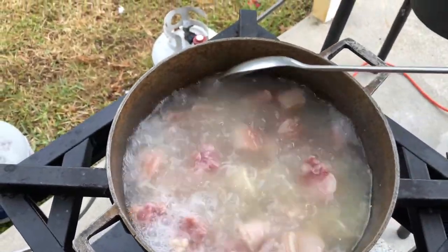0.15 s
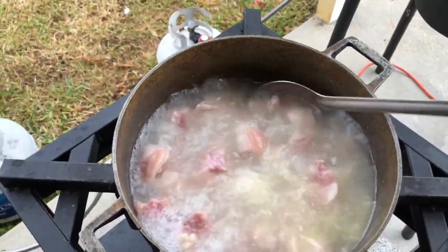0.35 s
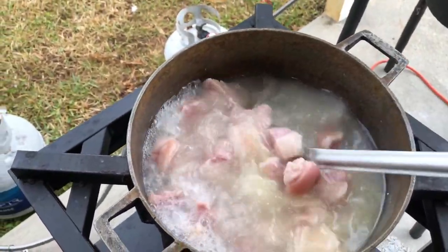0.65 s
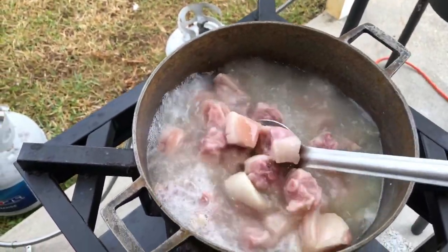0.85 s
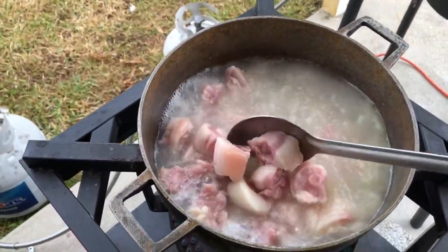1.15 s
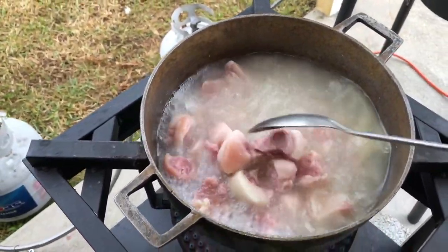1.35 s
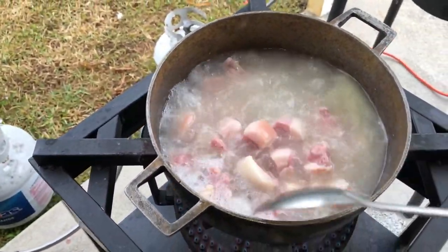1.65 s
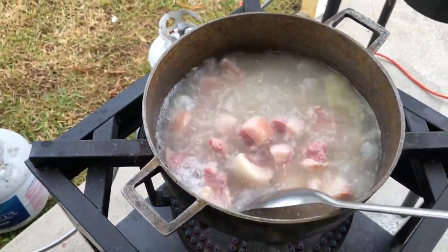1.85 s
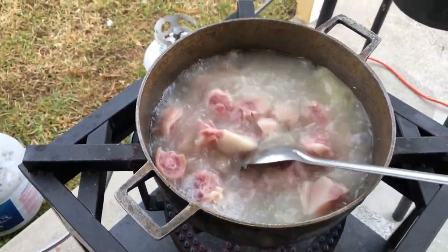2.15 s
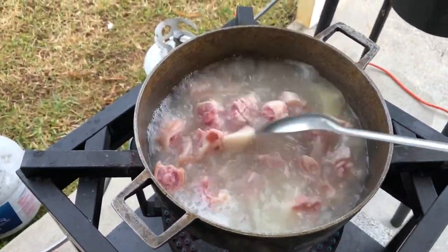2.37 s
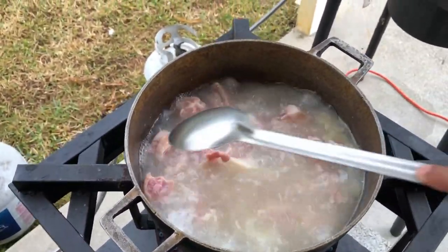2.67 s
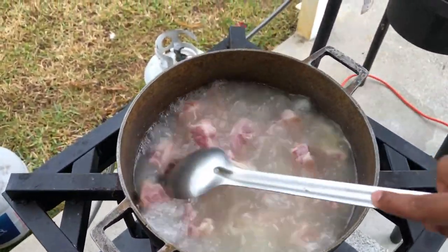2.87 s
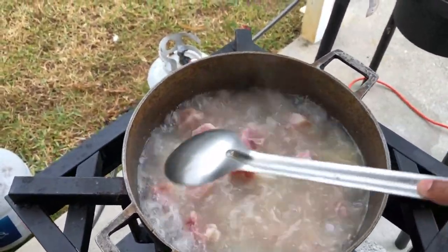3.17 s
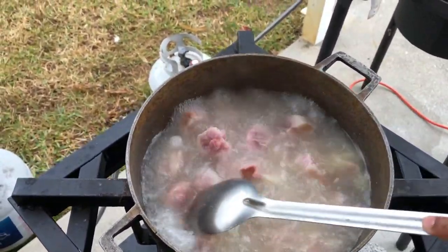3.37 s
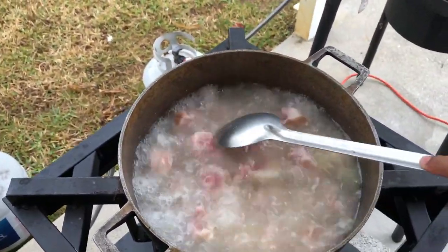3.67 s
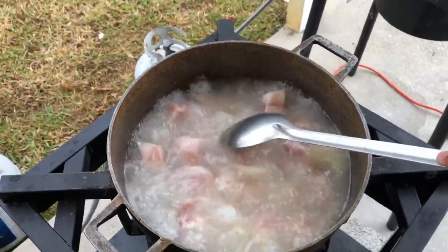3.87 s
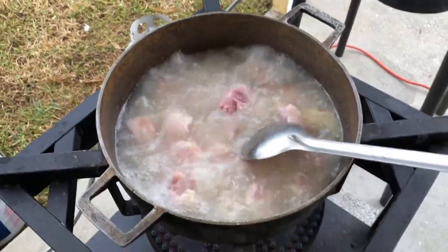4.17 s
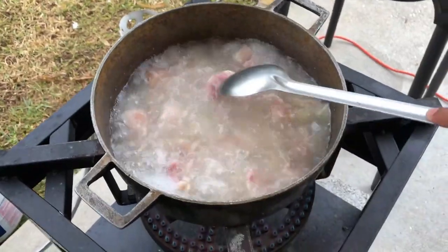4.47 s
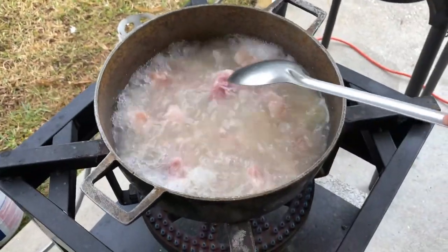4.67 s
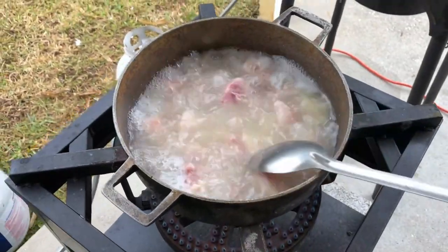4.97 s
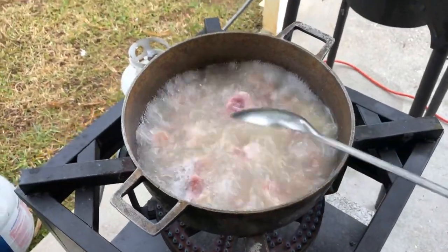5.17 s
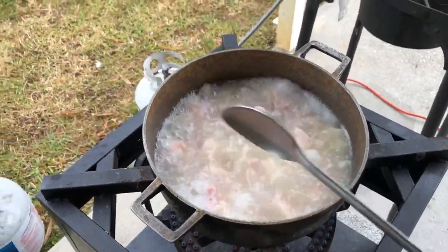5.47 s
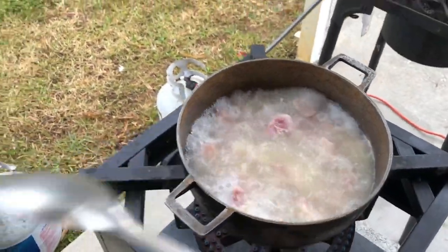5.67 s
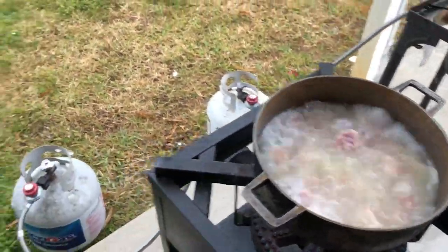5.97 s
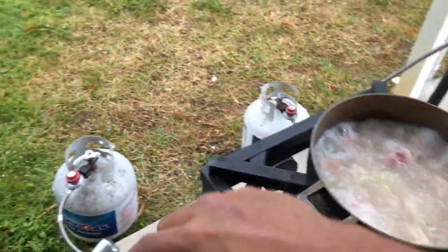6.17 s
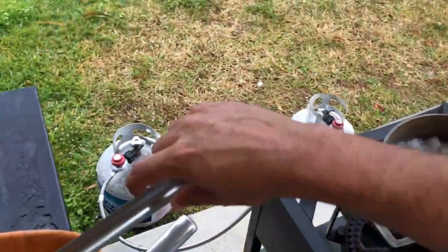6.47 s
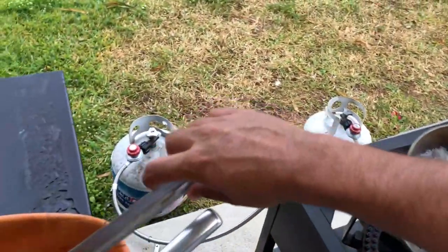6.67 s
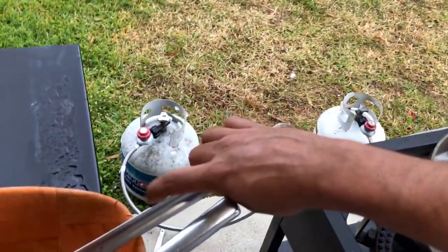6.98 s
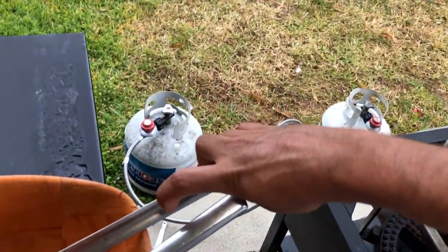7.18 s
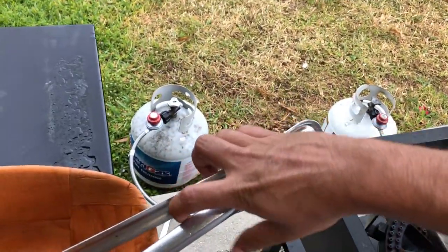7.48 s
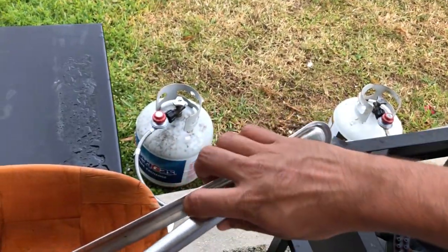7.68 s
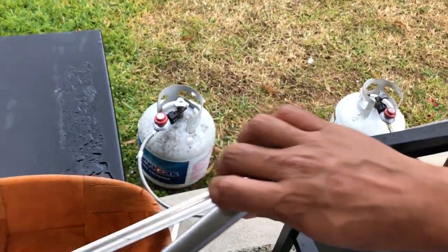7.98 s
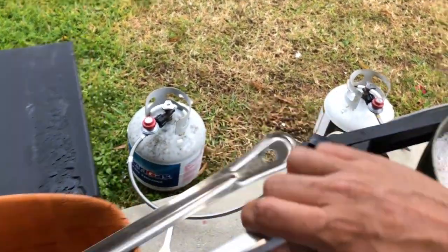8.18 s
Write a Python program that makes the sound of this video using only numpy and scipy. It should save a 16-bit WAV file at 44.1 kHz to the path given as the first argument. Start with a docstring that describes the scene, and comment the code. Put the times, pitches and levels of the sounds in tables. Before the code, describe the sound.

Throughout, a gas flame gives a broad, low-to-mid roar while a big iron pot boils hard, with dense wet plops and a thin high fizz. A bright spoon clink comes at 0.3 s with a small trailing touch at 0.4, then a faint scrape and sharp ticks near 0.7. Ringing clinks follow at 1.75 and 2.15 s, and a soft dull knock at 2.45. Low wind buffets at 2.6 and 3.0 s, growing to rumbling gusts from 3.5 to 5.4. Spoon taps sound at 4.55, 5.0 and 5.4 s, the last with a heavier thud. The wind fades by 6.2. At 6.37 s a utensil is put down with the loudest, short hard clack and a brief outdoor reflection. Faint rattling and sliding follow around 6.8 to 7.0, then tiny clicks from 7.7, a light knock at 8.0 and a last soft scrape near 8.3.

```python
"""Iron pot on a patio gas burner

One microphone on the patio takes in a big iron pot boiling over a roaring flame; a breeze buffets it.
Flame and breeze are shaped noise; steam bubbles plop and fizz as swarms of short damped sines.
A steel spoon knocks and slides on the pot; late on, a metal utensil is put down. Each blow is a burst of
noise through dense modes, with ringing metal and a short answer from the patio."""
import sys
import numpy as np
from scipy.fft import rfft, irfft, next_fast_len
from scipy.io import wavfile
from scipy.ndimage import uniform_filter1d, map_coordinates

SR = 44100
rng = np.random.default_rng(int(sys.argv[2]) if len(sys.argv) > 2 else 0)


def int16_out(signal):
    """Quantize to a 16-bit WAV file."""
    q = np.round(np.clip(np.atleast_2d(signal).T, -1, 1) * 32767)
    wavfile.write(sys.argv[1], SR, q.astype(np.int16))


N = 367353

# Steady breeze at the microphone. Each row: time in seconds, strength in dB.
WIND_LEVEL = [(0.0, -56), (0.28, -49.5), (1.14, -58.5), (2.55, -51), (3.48, -51), (3.62, -44.5),
              (4.01, -47), (4.24, -43.5), (5.15, -38.5), (6.19, -57), (8.33, -59.5)]
# Gusts riding on it. Each row: peak time in seconds, half length in seconds, peak strength in dB.
GUST_SWELLS = [(0.33, .11, -44), (2.58, 0.1, -42), (2.962, 0.092, -40.5), (3.58, 0.092, -39.5),
               (3.787, .04, -44), (4.055, 0.071, -39), (4.343, 0.081, -35.5), (4.52, 0.053, -31.5),
               (4.818, 0.077, -35.5), (5.14, 0.15, -37), (5.35, 0.045, -37), (5.752, 0.087, -40)]
# Spectrum of the slow lumps of air. Each row: frequency in Hz, relative density in dB per Hz.
LUMP_SPECTRUM = [(2, -27), (6, 10), (11, 4), (20, 3), (28, 1), (40, -24), (60, -22), (100, -50), (200, -57),
                 (480, -120)]
# Spectrum of the fast eddies. Each row: frequency in Hz, relative density in dB per Hz.
EDDY_SPECTRUM = [(10, 4), (27, -3.5), (50, -5.5), (65, -20), (100, -19), (130, -36.5), (200, -48),
                 (480, -120)]
# Flame level that also drives the plops. Each row: time in seconds, level in dB.
FLAME_LEVEL = [(0.0, -55.5), (0.51, -53), (0.72, -54.5), (1.69, -53), (1.97, -55), (2.37, -54),
               (2.55, -54.5), (3.04, -54.5), (4.66, -55.5), (5.61, -54), (5.84, -55), (8.33, -52.5)]
# Spectrum of the broad roar. Each row: frequency in Hz, relative density in dB per Hz.
FLAME_SPECTRUM = [(35, -42), (60, 1), (75, -4), (134, -5.5), (184, -16), (288, -11.5), (543, -14.5),
                  (866, -11), (987, -9), (1080, -8), (1600, -26), (2330, -27), (2810, -19.5), (3790, -44.5),
                  (5200, -59), (6760, -56), (11400, -120)]
# Resonances that the port in the microphone's case gives the roar, mainly near 1 and 3 kHz.
# Each row: frequency in Hz, width in Hz, gain in dB.
MIC_MODES = [(311.5, 29, -3.5), (890, 150, -4), (1159, 154, 1), (3060, 280, -13)]
# Level that drives the foam's fizz. Each row: time in seconds, level in dB.
FOAM_LEVEL = [(0.0, -72.5), (0.81, -70.5), (1.34, -73), (1.69, -70.5), (2.62, -70.5), (3.02, -73.5),
              (3.57, -70.5), (4.38, -72), (5.43, -70.5), (6.17, -75), (6.61, -72.5), (7.47, -75.5),
              (7.93, -72), (8.33, -75)]
# Spectrum of the fizz. Each row: frequency in Hz, relative density in dB per Hz.
FIZZ_SPECTRUM = [(2240, -31), (3800, -1), (4600, 0.5), (5000, -6.5), (5600, 2), (6620, -4.5), (7450, 0.5),
                 (9630, -3), (11200, 0), (12000, -5), (13700, -2), (15200, -8.5), (15800, -2.5)]
# Louder bubble snaps and light touches. Each row: start in seconds, nominal level in dB.
LOUD_SNAPS = [(0.6759, -45.5), (0.758, -50.5), (3.0836, -52), (3.3648, -50), (6.569, -53), (7.6844, -53),
              (7.818, -50.5), (8.064, -52), (8.158, -49.5)]
# Lower part of the snaps, strongest near 3 kHz. Each row: frequency in Hz, relative density in dB per Hz.
SNAP_BODY_COLOUR = [(1200, -28), (2300, 11), (3000, 17), (4200, -8), (5000, -13), (5700, -12), (8000, -10),
                    (15000, -33)]
# Steel slides along the pot or other utensils.
# Each row: middle in seconds, half length in seconds, level in dB, pitch in Hz.
SLIDES = [(0.63, 0.1, -61.5, 3860), (0.785, 0.034, -65.5, 3780), (1.678, 0.023, -60, 3800),
          (6.86, 0.11, -62.5, 2740), (7.893, 0.2, -71, 3850), (8.292, 0.087, -63, 2870)]
# Colours of a contact, from low to high; the tick also colours the upper part of the snaps.
# Each row: frequency in Hz, relative density in dB per Hz.
THUD_COLOUR = [(40, -69), (160, -13), (300, -8.5), (420, -9.5), (640, -6.5), (950, 2.5), (1200, -3),
               (1550, -23), (2200, -22), (5000, -102)]
CLINK_COLOUR = [(400, -69), (1100, 3), (1600, -12), (2200, -7), (2550, -5), (3000, 7.5), (3400, -8),
                (4300, -8), (5200, -20.5), (9000, -44)]
TICK_COLOUR = [(2000, -91), (4000, -30), (5000, -4.5), (5700, 9), (6600, -1.5), (8500, 3), (10500, -4.5),
               (11900, -0.5), (13200, -2), (14500, -17), (16000, -9)]
# Decay of the patio's answer. Each row: frequency in Hz, t60 in seconds.
PATIO_DECAY = [(200, 0.46), (1000, 0.38), (3000, 0.25), (8000, 0.2), (15000, .16)]
# Heavier knocks of pot and utensils. Each row: start in seconds, thud in dB, clink and tick in dB re thud,
# nominal contact t60 in seconds, loss per rebound in dB, ring in dB re thud.
HEAVY_KNOCKS = [(2.448, -34.5, -20, -45, 0.037, 4, -22), (5.394, -31, -16, -20, 0.058, 9, -8),
                (6.3693, -17, -5.5, -21.5, 0.0078, 7, -35), (6.793, -39, -4.5, -39, 0.032, 13, -11),
                (6.846, -39, -8, -30, 0.029, 21, -13), (6.962, -39, -24, -34, 0.022, 0, -27),
                (7.991, -39, -3.5, -16, 0.02, 4, -22)]
# Whole pot and stand, shaken by a heavy knock. Each row: frequency in Hz, level in dB, t60 in seconds.
STAND_MODES = [(283, -4, 0.33), (350, -11, 0.48), (890, -17, .13), (899, 1, 0.35), (1012, -15, 0.14),
               (1247, -5, 0.47), (2250, -15, 0.41), (2850, -19, .35)]
# Steel utensil as it is put down. Each row: frequency in Hz, level in dB, t60 in seconds.
UTENSIL_MODES = [(332, -50, 1.2), (600, -37, 0.08), (1880, -50, .07), (3000, -34, 0.057),
                 (4100, -34, 0.029), (5600, -39, .04), (12610, -78, 1.7)]
# Spoon on pot. Each row: start in seconds, nominal clink level in dB, clink pitch in Hz,
# thud and tick in dB re clink, nominal contact t60 in seconds, ring in dB re clink.
SPOON_TOUCHES = [(0.277, -28, 3220, -21, 4.5, 0.011, -18), (0.281, -38, 2870, -11, -6, 0.13, -18),
                 (0.318, -43, 2830, 1, -3.5, 0.096, -18), (0.419, -46.5, 2920, -3, -36, 0.25, -4),
                 (1.745, -26.5, 2930, -27, -7, 0.058, -5), (1.804, -34.5, 3030, -8, -10.5, .05, -4),
                 (2.157, -25, 3060, -10.5, -9, 0.045, -16), (2.261, -47, 2600, -15, -27, 0.094, -23),
                 (4.555, -36.5, 2620, -17, -14, 0.018, -24), (4.991, -27, 3650, -4, -7, 0.052, -5.5),
                 (5.377, -32.5, 3020, 5.5, 0.5, 0.049, -7.5)]
# Pot and spoon ringing. Each row: frequency in Hz, level in dB, t60 in seconds.
IRON_MODES = [(563, -17.5, 0.58), (942, -12, 0.55), (1200, -21, 0.64), (1690, -19.5, 0.3),
              (2140, -8.5, 0.083), (2160, -15, .3), (2374, -12.5, 0.28), (2680, -23, 0.41),
              (3010, -1, 0.15), (3390, -22, 0.56), (3820, -16, 0.27), (4520, -31, 0.12), (5566, -17, 0.2),
              (6040, -16, 0.088), (7460, -16, 0.15), (8530, -21, 0.17), (9800, -12, 0.13),
              (12700, -30, 0.18)]

LUMP_DB, EDDY_DB = 5.5, 2  # over the wind's strength
EDDY_GROWTH = 0.55  # extra dB of eddies per dB of wind
ROAR_DB, MIC_DB, PLOP_DB, FIZZ_DB = 1.5, -6.5, -9.5, 0.1  # each layer over the level that drives it
FAINT_SNAP_DB = -58.5  # nominal, for the randomly timed snaps
PUT_DOWN_S = 6.37  # when the utensil is put down
REBOUND_S = 0.0065  # between the contacts of a chattering knock
PATIO_DB, CONTACT_S = -16.5, 0.053  # the patio's basic answer, set for a contact with this t60 in seconds
TOP_HZ = 15850  # band limit of the recorder


def amp(db):
    """Decibels to gain."""
    return np.exp(np.asarray(db) * np.log(10) / 20)


def unit(x):
    """Scale to rms 1."""
    return x / np.sqrt(np.mean(x ** 2) + 1e-20)


def along(points, hz):
    """Read (Hz, value) points on a log frequency axis."""
    f, v = np.transpose(points)
    return np.interp(np.log(hz + 1), np.log(f + 1), v)


def curve(rows):
    """Draw (seconds, value) rows as one value per sample."""
    return np.interp(np.arange(N) / SR, *np.transpose(rows))


def wobble(rate):
    """A smooth random curve with rate knots a second."""
    knots = rng.standard_normal(int(N * rate / SR) + 4)
    return map_coordinates(knots, [np.arange(N) * rate / SR])


def swell(s, half_length):
    """A bell-shaped rise and fall around time s."""
    return np.exp(-np.minimum(((np.arange(N) / SR - s) / half_length) ** 2, 20))


def filtered(x, response):
    """Multiply the spectrum of x by a response of frequency."""
    m = next_fast_len(len(x) + 8192)
    return irfft(rfft(x, m) * response(np.fft.rfftfreq(m, 1 / SR)), m)[:len(x)]


def coloured(x, spectrum):
    """Filter x by a spectrum and scale it to rms 1."""
    return unit(filtered(x, lambda hz: amp(along(spectrum, hz))))


def noise(spectrum, size=N):
    """Fresh coloured noise of rms 1."""
    return coloured(rng.standard_normal(size), spectrum)


def add(track, s, sound):
    """Mix a sound into the track at time s."""
    part = track[max(round(s * SR), 0):][:len(sound)]
    part += sound[:len(part)]


def grains(count, pitch_hz, spread, cycles, size_db, rise, size):
    """Randomly timed damped sines of rms 1; with rise, each climbs in pitch like a bubble nearing the surface."""
    start, chance = rng.random((count, 2)).T
    hz = np.clip(pitch_hz * np.exp(spread * rng.standard_normal(count)), 100, SR / 3)[:, None]
    age = np.arange(size) / SR * hz / cycles  # 1 after the given number of cycles
    strength = amp(size_db * np.minimum(-np.log(1 - chance), 5))[:, None]  # few large, many small
    phase = 2 * np.pi * cycles * age * (1 + rise * age / 2)
    sines = strength * np.exp(-3 * age) * np.sin(phase)
    at = (start * N).astype(int)[:, None] + np.arange(size)
    return unit(np.bincount(at.ravel(), sines.ravel(), N)[:N])


def eddies(spectrum):
    """Low turbulence, evened out by its own running power."""
    flow = noise(spectrum)
    return flow / np.sqrt(np.abs(uniform_filter1d(flow ** 2, size=7000)) + 0.05)


def breeze():
    """Slow lumps of air push on the microphone; small fast eddies grow more steeply with each gust."""
    steady = amp(curve(WIND_LEVEL) + 0.91 * wobble(6.4))
    gust_power = sum((amp(db) * swell(s, half_length)) ** 2 for s, half_length, db in GUST_SWELLS)
    strength = np.sqrt(steady ** 2 + gust_power)
    steeper = (strength / strength.max()) ** EDDY_GROWTH
    lumps = amp(LUMP_DB) * eddies(LUMP_SPECTRUM)
    fast = amp(EDDY_DB) * steeper * eddies(EDDY_SPECTRUM)
    return strength * (lumps + fast)


def mic_port(f):
    """Response of the port in the microphone's case: a sum of band-pass resonances."""
    return sum(amp(db) * 1j * f * w / (c * c - f * f + 1j * f * w) for c, w, db in MIC_MODES)


def burner():
    """Turbulent flame: a broad roar, plus a part that resonates in the microphone's port."""
    drive = noise([(100, -24), (300, 3.5), (1250, 0.5), (1600, -21.0), (2900, 4.5), (4000, -7.0)])
    resonant = unit(filtered(drive, mic_port))
    level = amp(curve(FLAME_LEVEL) + 0.69 * wobble(7))
    return level * (amp(ROAR_DB) * noise(FLAME_SPECTRUM) + amp(MIC_DB) * resonant)


def broth():
    """Large steam bubbles plop; the foam bursts in a fine fizz, with a few brighter droplets."""
    plops = grains(count=1800, pitch_hz=777, spread=0.347, cycles=10.6, size_db=2.7, rise=0.22, size=1400)
    crackle = grains(count=9000, pitch_hz=8830, spread=0.4, cycles=5.5, size_db=5.0, rise=0.16, size=100)
    droplets = grains(count=450, pitch_hz=11200, spread=0.14, cycles=16, size_db=1.5, rise=0.1, size=160)
    fizz = amp(-0.5) * noise(FIZZ_SPECTRUM)
    fizz += amp(-5.5) * coloured(crackle, FIZZ_SPECTRUM)
    fizz += amp(-12.5) * droplets
    plop_level = amp(curve(FLAME_LEVEL) + PLOP_DB)
    fizz_level = amp(curve(FOAM_LEVEL) + FIZZ_DB + 0.27 * wobble(11))
    return plop_level * plops + fizz_level * fizz


def snaps(count=8):
    """Bubbles bursting and light touches: short bright noise with a fast and a slower decay."""
    track = np.zeros(N)
    t = np.arange(SR // 10) / SR
    faint = [(s, FAINT_SNAP_DB) for s in rng.random(count) * N / SR]
    fall = amp(-60 * t / 0.02) + amp(-0.5 - 60 * t / 0.13)
    for s, db in LOUD_SNAPS + faint:
        bright = noise(TICK_COLOUR, len(t)) + 1.5 * noise(SNAP_BODY_COLOUR, len(t))
        add(track, s, amp(db - 15.5) * fall * bright)
    return track


def scrapes():
    """Steel sliding on metal: many tiny slips, coloured around a pitch, swell and fade."""
    track = np.zeros(N)
    slips = grains(count=24000, pitch_hz=3930, spread=1.0, cycles=0.43, size_db=3.0, rise=0, size=60)
    for s, half_length, db, hz in SLIDES:
        colour = [(hz / 3, -30), (hz * 0.7, -8), (hz, 0), (hz * 1.4, -9), (hz * 4, -20)]
        track += amp(db) * swell(s, half_length) ** 2 * coloured(slips, colour)
    return track


def struck(force, colour):
    """A force through a causal (minimum-phase) body with the given spectrum; its energy is kept."""
    size = next_fast_len(2 * len(force))
    cepstrum = irfft(np.log(amp(along(colour, np.fft.rfftfreq(size, 1 / SR)))), size)
    cepstrum[1:size // 2] *= 2  # fold onto positive time
    cepstrum[size // 2:] = 0
    sound = irfft(rfft(force, size) * np.exp(rfft(cepstrum)), size)[:len(force)]
    return sound * np.linalg.norm(force) / np.linalg.norm(sound)


def centre(colour):
    """Frequency in Hz where a colour is strongest."""
    return max(colour, key=lambda point: point[1])[0]


def blow(thud_db, clink_db, tick_db, t60, clink_hz, wet_db):
    """A rough force excites three ranges of dense modes; a longer contact draws a stronger patio answer."""
    size = SR // 2
    t = np.arange(size) / SR
    t60 = max(t60, 0.004)
    tail_db = PATIO_DB + wet_db + 10 * np.log10(t60 / CONTACT_S)
    # the pitch depends on where the steel is hit
    clink = [(hz * clink_hz / centre(CLINK_COLOUR), db) for hz, db in CLINK_COLOUR]
    # colour, level in dB, stretch of the contact t60
    ranges = ((THUD_COLOUR, thud_db, 1.2), (clink, clink_db, 1.0), (TICK_COLOUR, tick_db, 0.8))
    sound = np.zeros(size)
    for colour, db, life in ranges:
        force = amp(-60 * t / (t60 * life)) * rng.standard_normal(size)
        build_up = 1 - np.exp(-t / 0.0065)
        answer = amp(tail_db - 60 * t / along(PATIO_DECAY, centre(colour))) * build_up
        sound += amp(db) * (struck(force, colour) + answer * noise(colour, size))
    return sound


def ring(modes, vary_db, wander=0.06):
    """Free modes at fresh strengths; moving broth and grip make the phase wander (rms turns in 10 ms)."""
    t = np.arange(SR // 2) / SR
    knots_s = np.linspace(0, t[-1], 251)
    step = wander * np.sqrt(100 * knots_s[1])
    sound = np.zeros(len(t))
    for hz, db, t60 in modes:
        envelope = amp(db + vary_db * rng.standard_normal() - 60 * t / t60)
        drift = step * np.interp(t, knots_s, np.cumsum(rng.standard_normal(len(knots_s))))
        sound += envelope * np.sin(2 * np.pi * (hz * t + drift + rng.random()))
    return sound * np.minimum(10 * (t[-1] - t), 1)  # fade out over the last 0.1 s


def knocks():
    """Heavier blows chatter in three contacts and ring pot and stand; a put-down utensil rings too."""
    track = np.zeros(N)
    for s, db, clink_db, tick_db, t60, loss_db, ring_db in HEAVY_KNOCKS:
        for rebound in range(3):
            thud_db = db - rebound * loss_db
            contact = blow(thud_db, thud_db + clink_db, thud_db + tick_db, t60, clink_hz=2886, wet_db=3.5)
            add(track, s + rebound * REBOUND_S, contact)
        add(track, s, amp(db + ring_db) * ring(STAND_MODES, vary_db=0.0))
    add(track, PUT_DOWN_S, ring(UTENSIL_MODES, vary_db=5.0, wander=0.023))
    return track


def spoon():
    """Every touch of the spoon is a short contact that rings the iron wall."""
    track = np.zeros(N)
    for s, db, clink_hz, thud_db, tick_db, t60, ring_db in SPOON_TOUCHES:
        contact = blow(db + thud_db, db, db + tick_db, t60, clink_hz, wet_db=-2)
        wall = amp(db + ring_db) * ring(IRON_MODES, vary_db=-2.0)
        add(track, s, amp(-5.0) * (contact + wall))
    return track


def scene():
    """All sources at the one microphone."""
    background = breeze() + burner() + broth()
    metal = scrapes() + knocks() + spoon()
    return (background + snaps() + metal)[None]


def record(dry):
    """The recorder cuts steeply above its band limit."""
    return np.array([filtered(x, lambda hz: 1 / (1 + (hz / TOP_HZ) ** 160)) for x in dry])


dry = scene()
out = record(dry)
int16_out(out)
```